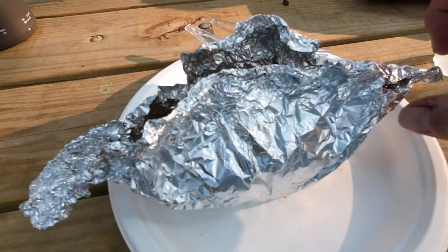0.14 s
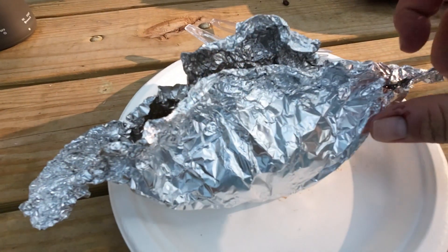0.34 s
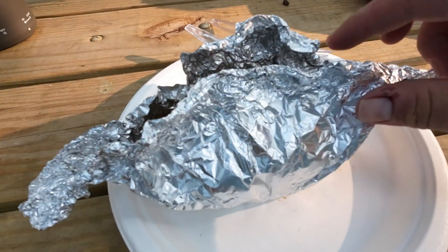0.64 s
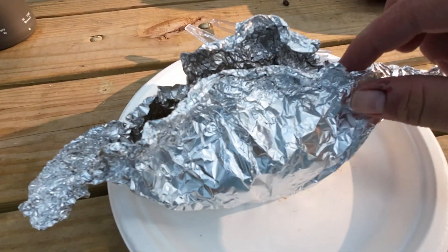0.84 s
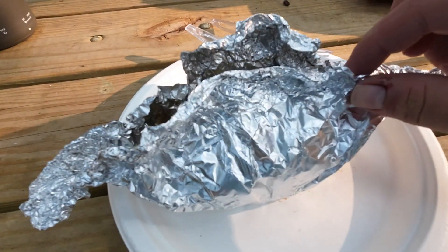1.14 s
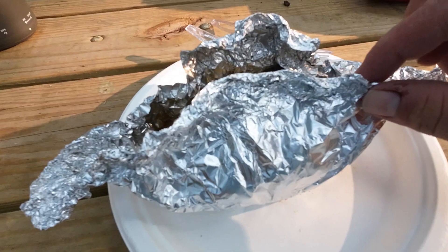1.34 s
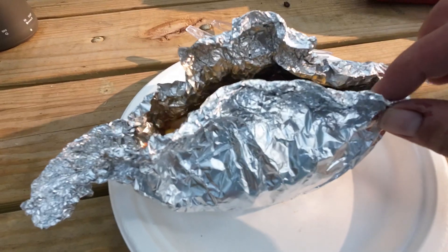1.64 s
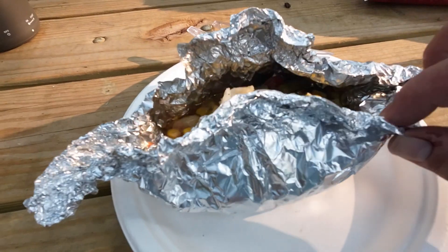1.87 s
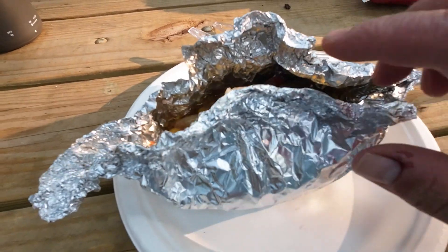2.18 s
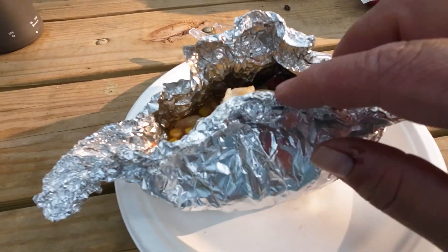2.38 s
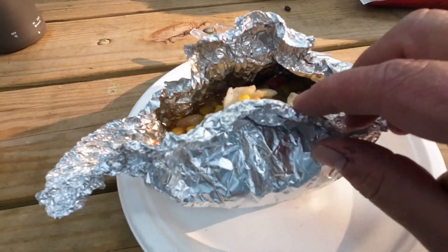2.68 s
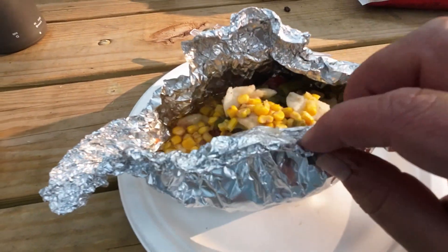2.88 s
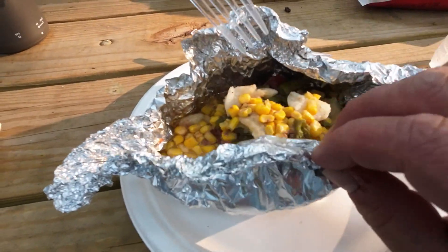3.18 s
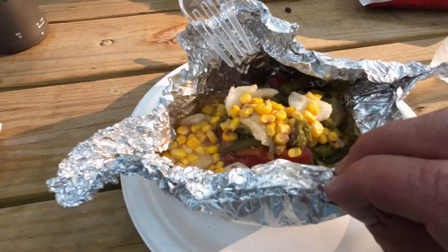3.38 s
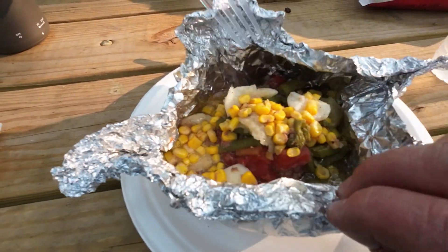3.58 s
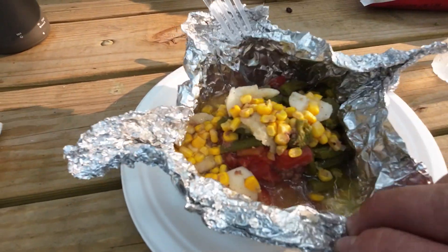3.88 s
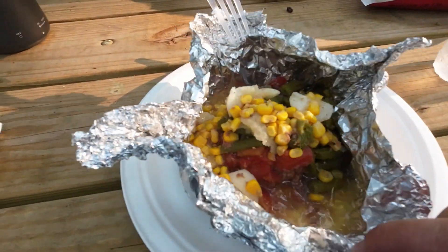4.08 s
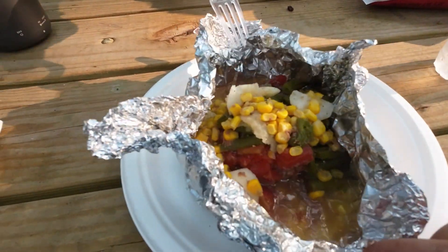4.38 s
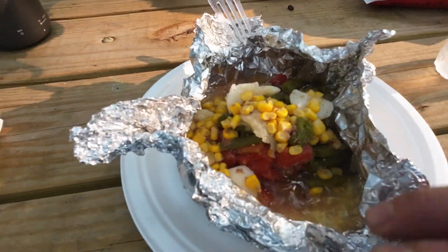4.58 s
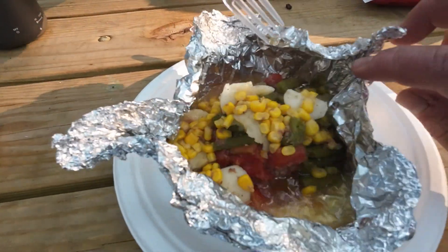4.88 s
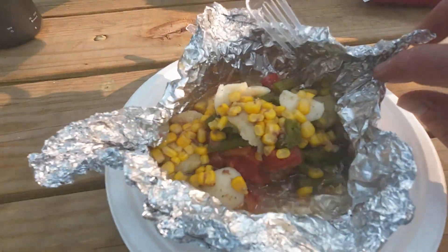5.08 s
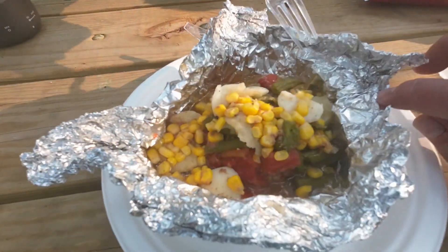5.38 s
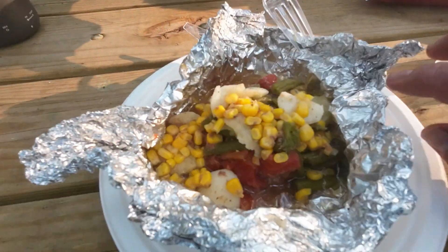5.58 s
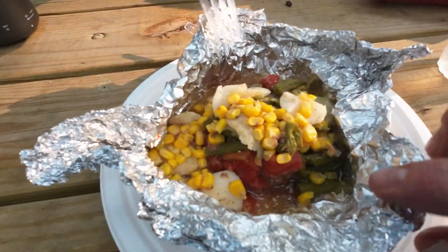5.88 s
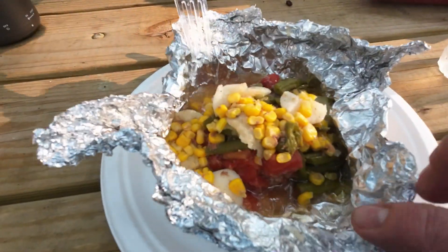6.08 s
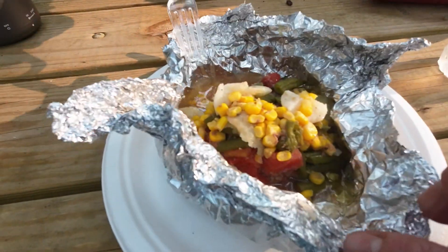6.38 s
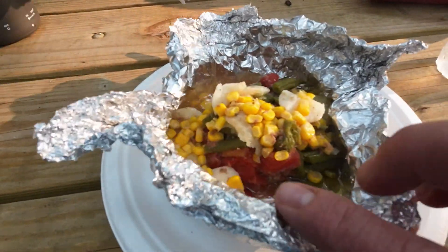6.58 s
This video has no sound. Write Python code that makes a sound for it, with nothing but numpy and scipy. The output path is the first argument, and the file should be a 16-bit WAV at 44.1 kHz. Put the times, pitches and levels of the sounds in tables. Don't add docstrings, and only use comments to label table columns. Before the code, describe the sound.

Very close to the microphone, fingers open a foil packet on a plate outdoors. At first only low wind, distant traffic and faint thin bird whistles, with a few tiny ticks. After two seconds the foil begins to crackle, with sharp metallic snaps, skin hiss and short scrapes on the plate. The loudest pops come near four seconds; crinkling continues in bursts to the end. The sound is slightly hollow.

```python
import sys
import numpy as np
from scipy import signal
from scipy.fft import rfft, irfft, next_fast_len
from scipy.io import wavfile
from scipy.ndimage import uniform_filter1d, map_coordinates

SR = 44100
rng = np.random.default_rng(int(sys.argv[2]) if len(sys.argv) > 2 else 0)


def voltage_ratio(level):
    return 10 ** (np.asarray(level, float) / 20)


def master(y):
    cut = np.clip(np.atleast_2d(y).T, -1, 1)
    pcm = np.round(cut * 32767)
    wavfile.write(sys.argv[1], SR, pcm.astype(np.int16))


N = 296793
LATE_S = 166.5 / 44100

# (frequency [Hz], density [dB per Hz])
AIR_SPECTRUM = [(90, 3), (190, -0.5), (330, -6.5), (420, -16), (770, -18.5), (1100, -20.5), (1500, -28.5),
                (2400, -28), (3500, -32), (6300, -35), (16000, -39)]
# (frequency [Hz], left-right likeness [0-1])
AIR_COHERENCE = [(100, 1), (300, 0.96), (1400, 0.85), (3000, 0.51), (7000, 0), (15000, 0)]
# (time [s], buffet level [dB], drone level [dB])
WIND = [
    (0.0, -57.5, -70.5),
    (2.25, -56.5, -65.5),
    (2.38, -55, -43.5),
    (2.9, -55.5, -75.5),
    (4.54, -56, -57.5),
    (4.91, -49, -45.5),
    (5.32, -53.5, -53.5),
    (6.73, -54, -69),
]
# (time [s], frequency [Hz], level [dB])
THIN_CALLS = [
    [(.18, 9600, -89), (.21, 10600, -89), (.245, 10900, -86), (.27, 11300, -84), (.295, 11200, -83),
     (.305, 10500, -83)],
    [(.32, 10500, -88), (.37, 10900, -94), (.42, 11450, -70), (.46, 11100, -89), (.5, 10100, -93),
     (.545, 9600, -89), (.565, 8700, -95)],
    [(1.89, 9000, -80), (1.94, 11000, -81)],
    [(2.16, 10300, -78), (2.22, 9500, -85), (2.28, 9300, -88)],
]
# (time [s], length [s], start frequency [Hz], end frequency [Hz], level
# [dB])
WHISTLES = [
    (.19, .3, 4040, 3970, -81),
    (.57, .22, 2260, 2080, -80),
    (1.945, .11, 4080, 4010, -74),
    (5.73, .17, 4030, 4020, -82),
    (.001, .19, 2400, 2340, -84),
]
# (time [s], level [dB], frequency [Hz])
THUMPS = [
    (2.063, -39.5, 92),
    (3.574, -42.5, 110),
    (4.834, -46, 126),
    (4.982, -50, 99),
    (6.385, -41, 89.5),
]
# (frequency [Hz], density [dB per Hz])
SHEET_SPECTRUM = [(900, -53), (1500, -2.5), (2400, 5.5), (3500, 7), (5500, -4), (8000, 2.5), (11000, -9)]
# (frequency [Hz], density [dB per Hz])
SKIN_SPECTRUM = [(4300, -12), (5400, 5), (6800, 0.5), (11000, 7), (15800, -1.5)]

# (time [s], length [s], level [dB])
HOLDS = [
    (1.945, 0.23, -73),
    (2.342, 0.85, -72),
    (3.14, 0.45, -74),
    (3.623, 1.075, -70),
    (4.677, 0.36, -81.5),
    (5.028, 0.79, -75.5),
    (6.247, 0.46, -78),
]
# (time [s], length [s], level [dB])
STROKES = [
    (1.021, 0.24, -78.5),
    (1.04, 0.13, -73.5),
    (5.125, 0.51, -72),
    (6.49, 0.096, -62.5),
]
# (time [s], length [s], level [dB])
SLIDES = [(2.116, 0.037, -56), (2.552, 0.081, -57), (2.649, 0.279, -63.5), (2.99, 0.16, -63.5),
          (3.857, 0.064, -62.5), (4.98, 0.042, -83), (5.615, 0.121, -62.5), (6.247, 0.045, -72),
          (6.374, 0.12, -67), (6.533, 0.072, -56), (6.672, .07, -66.5)]
# (time [s], length [s], level [dB])
BENDS = [
    (1.971, 0.046, -70),
    (2.033, 0.057, -60),
    (2.402, 0.068, -62),
    (3.913, 0.067, -53),
    (5.885, 0.13, -53.5),
    (6.093, 0.15, -59),
    (6.6, 0.068, -66.5),
]
# (time [s], length [s], level [dB])
DRAGS = [(3.378, 0.12, -67), (3.566, 0.054, -52.5), (3.705, 0.11, -66), (3.982, 0.21, -69),
         (4.189, 0.13, -62.5), (4.447, 0.15, -67), (4.588, 0.043, -58), (4.632, 0.04, -67.5),
         (4.834, 0.035, -60), (5.245, 0.11, -65), (5.944, 0.11, -58.5), (6.053, 0.04, -50),
         (6.175, 0.07, -52.5), (6.452, 0.069, -57.5)]
# (movements, crackle [dB], finger hiss [dB], plate scrape [dB])
MOVES = [(HOLDS, 0, -5.5, -3.6), (SLIDES, 0, -3, -10), (BENDS, 0, -3.5, -9), (DRAGS, 0, -7, 0),
         (STROKES, -0.5, 0, -1.6)]
# (time [s], length [s],
# level [dB], frequency [Hz])
HOLLOWS = [(1.04, 0.17, -70, 5400), (2.048, 0.081, -57.5, 203), (2.428, .005, -33, 11200),
           (2.1035, .006, -52, 11200), (2.113, 0.03, -68, 870), (2.603, 0.035, -51, 203),
           (2.68, 0.018, -66, 966), (3.339, 0.016, -67, 800), (3.422, 0.052, -60.5, 830),
           (3.569, 0.019, -49.5, 790), (3.6, .014, -47, 1350), (3.734, 0.024, -56, 815),
           (3.785, .015, -67, 860), (3.794, 0.02, -56, 500), (3.893, 0.0092, -62, 840),
           (4.065, 0.039, -57.5, 1090), (4.46, .02, -56, 746), (4.544, 0.023, -63.5, 1020),
           (4.596, 0.027, -57.5, 1090), (4.836, 0.025, -49.5, 320), (4.838, 0.012, -57, 1030),
           (5.126, .06, -73, 2250), (5.311, 0.012, -50, 1080), (5.415, 0.018, -63, 790),
           (5.441, 0.024, -65, 760), (5.636, 0.082, -77, 5700), (5.909, 0.019, -52, 760),
           (5.995, 0.018, -52, 540), (6.052, 0.008, -41.5, 330), (6.053, 0.0065, -44, 1100),
           (6.145, 0.024, -59, 560), (6.23, 0.018, -48, 505), (6.456, 0.017, -51.5, 1360),
           (5.1, 0.15, -55.5, 110), (6.04, .22, -60.5, 150), (6.38, 0.053, -56, 160),
           (6.49, .1, -70, 14500)]

# (time [s], peak level [dB], ring frequency [Hz], tearing time [ms])
PINGS = [(1.5818, -40.5, 2090, 0.61), (2.7249, -20.5, 3970, 1.3), (2.7554, -36, 2520, 1.3),
         (2.7758, -22.5, 1720, 4.7), (2.863, -27.5, 2650, 1.7), (2.877, -35, 3980, 1.5),
         (2.946, -26.5, 4060, 0.3), (2.9923, -42.5, 3250, 1.2), (3.0253, -42, 2290, 1.4),
         (3.2388, -37, 2240, 4.2), (3.8573, -19, 2470, 1.8), (3.9177, -11, 2375, 2.17),
         (3.9526, -36, 3850, 2), (3.9692, -34, 2480, 1.3), (4.2427, -27, 4800, 0.92),
         (4.2665, -16.5, 1750, 2.7), (4.5, -40.5, 2540, 1.7), (5.3729, -33.5, 3460, 2.9),
         (5.464, -42, 2650, 0.93), (5.579, -22, 3730, 1.9), (5.59, -16, 3650, 2.8),
         (6.1692, -28, 3200, 4.5), (6.405, -54, 6200, .8), (6.4154, -43.5, 6300, .8),
         (6.5767, -31, 4180, 1.1)]
# (time [s], peak level [dB], ring frequency [Hz], tearing time [ms])
FOLDS = [(2.3427, -38.5, 4900, 2.1), (2.5574, -26.5, 3450, 7.3), (2.5656, -23.5, 3350, 2.6),
         (2.6106, -24, 5330, 7.6), (3.3373, -42.5, 3700, 6.9), (3.4851, -39, 1860, 2.3),
         (4.0634, -38.5, 1600, 7.7), (4.283, -35.5, 2640, 3.8), (4.367, -24.5, 2370, 4.5),
         (4.5957, -38, 1590, 3.3), (4.9337, -47, 2470, 3.9), (4.9849, -25, 5520, 2.8),
         (5.554, -40, 3280, 2.3), (5.7019, -27.5, 2250, 2.3), (6.1308, -33, 1740, 6.8),
         (6.3873, -21, 6030, 2.4), (6.4221, -46, 5860, 1), (6.6216, -42, 3780, 11)]
# (time [s], peak level [dB], ring frequency [Hz], tearing time [ms])
RIM = [(.9072, -50, 4850, 1.8), (.936, -48, 4040, 2.8), (1.4765, -57.5, 3250, 2.9), (2.101, -30, 2470, 1.7),
       (3.4022, -40, 5300, 2.3), (4.163, -36, 2500, 2), (4.2035, -30, 4870, 1.5), (4.449, -35, 2780, 1.5),
       (4.5618, -31, 2720, 1.4), (5.2442, -39, 1700, 1.7), (5.6259, -43.5, 3300, 1.5),
       (5.8987, -36, 3830, 11), (5.9646, -32.5, 2340, 3.7), (6.3363, -40, 6930, 2)]
# (time [s], peak level [dB], ring frequency [Hz], tearing time [ms])
PRESSED = [(2.3736, -48.5, 5400, 0.65), (2.8639, -43, 1590, 7.2), (3.795, -43.5, 1620, 3.8),
           (4.1926, -34, 1330, 0.83), (4.2119, -28, 1330, 1.7), (5.2184, -51.5, 1630, 1.7),
           (5.2677, -39.5, 1580, 1.4), (5.2803, -40, 3020, 1.3), (5.3112, -31, 5700, 2.45),
           (5.6807, -44.5, 2150, 10.4), (5.9156, -37, 1770, 7.9), (6.4593, -37, 3830, 0.66)]
# (time [s], peak level [dB], ring frequency [Hz], tearing time [ms])
SLAPS = [(.8821, -48.5, 5000, 2.6), (1.7132, -48.5, 5120, 1.4), (1.936, -50, 3930, 0.74),
         (2.036, -38.5, 2210, 3.3), (2.0641, -42, 3250, 1.7), (2.1335, -42, 2000, 4.8),
         (2.6263, -48, 6240, 0.78), (2.702, -42, 1600, 2.6), (3.382, -46.5, 2620, 2.5),
         (3.569, -28.5, 2280, 2), (3.579, -23.5, 4980, 0.9), (3.601, -28, 1710, 2.3),
         (3.828, -46.5, 2190, 2.1), (3.8938, -49, 3840, 1.7), (4.457, -36.5, 2450, 1.9),
         (4.489, -47.5, 5260, 1.3), (4.836, -44, 1590, 3.4), (5.991, -29, 5440, 2.2),
         (6.0543, -32, 1950, 2.5), (6.0791, -25.5, 3510, 2.5), (6.234, -30, 2660, 5),
         (6.3688, -70, 3480, 2.8)]
# (time [s], peak level [dB], ring frequency [Hz], tearing time [ms])
FLICKS = [
    (1.1046, -60, 3260, 1.8),
    (2.0175, -51, 1620, 1.3),
    (2.4216, -68, 3070, 2.5),
    (2.001, -61, 4000, 1.4),
    (2.4288, -36.5, 5900, 1.4),
    (2.4595, -47, 3350, 1.3),
    (4.1279, -48, 1530, 1.4),
    (6.023, -58, 2670, 2.2),
    (6.274, -62, 5460, 0.92),
]
# (time [s], peak level [dB], ring frequency [Hz], tearing time [ms])
POPS = [(2.418, -52, 3300, 4), (2.473, -57, 6000, 1), (2.519, -53, 2800, 2), (2.532, -45.5, 6000, .8),
        (2.546, -55, 2410, .8), (2.5715, -23.5, 2250, 3), (2.611, -22, 5620, 1.2), (2.648, -45, 5500, 1),
        (2.7477, -37, 6500, 0.73), (2.848, -53, 6500, .8), (3.009, -52, 2320, 1.3), (3.446, -49, 2380, 2.4),
        (3.8573, -25, 5600, 0.73), (3.9177, -20.5, 4530, 0.82), (3.858, -28.5, 1500, 1.7),
        (3.93, -36, 5300, 1), (4.146, -44, 2650, 2), (4.229, -52, 1450, 1.3), (4.255, -51, 3100, 1),
        (5.012, -53.5, 5500, .8), (5.021, -55, 5460, 1), (5.047, -52, 6800, .8), (5.077, -60, 5200, 1.4),
        (5.093, -73, 5260, 1), (5.253, -50, 2600, 1.4), (5.337, -56, 4500, 2.5), (5.3666, -37.5, 5500, 1.5),
        (5.526, -50, 1610, 2.5), (5.615, -52, 3450, 1.5), (5.775, -56.5, 5460, 2), (6.072, -35, 3020, 3.4),
        (6.0791, -24.5, 3480, 2.3), (6.365, -59, 5540, 2), (6.383, -41, 5500, 1.5), (6.543, -37, 3190, 1.5),
        (6.557, -42, 3700, 1.9)]
# (creases, plate knock [dB], edge crack [dB])
CREASES = [(PINGS, -34.5, -26), (FOLDS, -21, -21), (RIM, -23, -13), (PRESSED, -11.5, -20.5),
           (SLAPS, -14.5, -12.5), (FLICKS, -18, 0.76)]
POP_KIND = [(POPS, -28, -14.5)]

# (frequency [Hz], width [Hz], level [dB])
PORT_CAVITIES = [(4600, 1000, -17.5), (11000, 9300, 1), (15400, 1000, -3)]
# (frequency [Hz], gain [dB])
MIX_TONE = [(4500, -1.5), (5500, 1.5), (6500, -3.5), (9000, -7.5), (10500, 1.5), (12000, 0.5), (12600, -19),
            (14800, 0), (15750, -4), (16000, -14)]


def unit(x):
    return x / np.sqrt(np.mean(x ** 2) + 1e-20)


def along(points, hz):
    f, v = np.transpose(points)
    return np.interp(np.log(hz + 1), np.log(f + 1), v)


def curves(rows):
    s, *cols = np.transpose(rows)
    return [np.interp(np.arange(N) / SR, s, c) for c in cols]


def wobble(rate):
    knots = rng.standard_normal(int(N * rate / SR) + 4)
    return map_coordinates(knots, [np.arange(N) * rate / SR])


def filtered(x, response):
    m = next_fast_len(N + 8192)
    return irfft(rfft(x, m) * response(np.fft.rfftfreq(m, 1 / SR)), m)[..., :N]


def coloured(x, spectrum):
    closed = [(spectrum[0][0] / 2, -120), *spectrum, (spectrum[-1][0] * 10.0, -120)]
    return unit(filtered(x, lambda hz: voltage_ratio(along(closed, hz))))


def band(x, lo_hz, hi_hz):
    sos = signal.butter(2, [lo_hz, min(hi_hz, SR / 2.1)], "band", fs=SR, output="sos")
    return signal.sosfilt(sos, x)


def patchy(depth_db):
    z = signal.stft(rng.standard_normal((2, N)), nperseg=256)[2]
    field = uniform_filter1d(rng.standard_normal(z.shape[1:]), size=7, axis=0)
    field = uniform_filter1d(field, size=5, axis=1)
    return signal.istft(z * voltage_ratio(depth_db * unit(field)), nperseg=256)[1][:, :N]


def ambience():
    def mid_side(hz):
        turn = np.arccos(np.clip(along(AIR_COHERENCE, hz), -1, 1)) / 2
        return np.array([np.cos(turn), np.sin(turn)])

    mid, side = filtered(coloured(rng.standard_normal((2, N)), AIR_SPECTRUM), mid_side)
    return voltage_ratio(-61.5 + 1.5 * wobble(2.07)) * np.array([mid + side, mid - side])


def wind():
    buffet_db, drone_db = curves(WIND)
    buffet = coloured(rng.standard_normal((2, N)), [(18, -7.5), (35, -10.5), (50, -8.0), (60, -5.0)])
    hum_hz = 35 + 4 * np.array([wobble(9.8), wobble(3.7)])
    hum = np.sin(2 * np.pi * np.cumsum(hum_hz, axis=1) / SR)
    drone = coloured(rng.standard_normal((2, N)),
                     [(62, -10.0), (72, 7.0), (79, 15.0), (88, 3.5), (105, -30.0), (300, -24.0)])
    mid, side = voltage_ratio(buffet_db - 3.0) * (buffet + 0.79 * hum) + voltage_ratio(drone_db - 3.5) * drone
    side = voltage_ratio(2.5) * side + voltage_ratio(-4) * np.roll(mid, 260)
    return np.array([mid + side, mid - side])


def birds():
    t, song = np.arange(N) / SR, np.zeros(N)
    for call in THIN_CALLS:
        first, last = call[0], call[-1]
        hz, db = curves([(first[0] - .01, first[1], -120), *call, (last[0] + .01, last[1], -120)])
        turns = np.cumsum(hz + 90 * wobble(120)) / SR
        loudness = voltage_ratio(db - 1.0 + 2.6 * wobble(81))
        twin = voltage_ratio(-7 + 5 * wobble(22)) * np.sin(2 * np.pi * 1.055 * turns)
        song += loudness * (np.sin(2 * np.pi * turns) + twin)
    for s, length, hz, end_hz, db in WHISTLES:
        u = np.clip((t - s) / length, 0, 1)
        pitch = end_hz + (hz - end_hz) * (1 - u) ** 2 + 25 * wobble(59)
        loudness = voltage_ratio(db - 8 * u + 4 * wobble(35))
        swell = np.abs(np.sin(np.pi * u ** (1 / 4)))
        song += loudness * swell * np.sin(2 * np.pi * np.cumsum(pitch) / SR)
    echo = voltage_ratio(-9) * np.roll(song, 1100)
    return np.array([song, voltage_ratio(6) * np.roll(song, 1)]) + echo


def thumps():
    out, t = np.zeros((2, N + 4096)), np.arange(4096) / SR
    for s, db, hz in THUMPS:
        swing = voltage_ratio(db - 60 * t / 0.1) * np.sin(2 * np.pi * hz * t)
        start = round(s * SR)
        out[:, start:start + len(t)] += swing * voltage_ratio([[-5], [4]])
    return out[:, :N]


def movements():
    t = np.arange(N) / SR + LATE_S / 2
    power = voltage_ratio(2 * np.array((-99, -105, -94)))[:, None]
    for rows, *mix_db in MOVES:
        for s, length, db in rows:
            under_way = (t >= s) & (t < s + length)
            power = power + voltage_ratio(2 * (db + np.array(mix_db)))[:, None] * under_way
    edge_s = 0.009
    return uniform_filter1d(10 * np.log10(power), size=round(edge_s * SR))


def hollows():
    out = np.zeros((2, N + 8192))
    spread = 1.22
    for s, length, db, hz in HOLLOWS:
        u = np.arange(8192) / SR / max(length, .003)
        ring = unit(band(rng.standard_normal((2, 8192)), hz / spread, hz * spread))
        start = round(s * SR)
        out[:, start:start + 8192] += voltage_ratio(db) * np.sin(np.pi * np.minimum(u, 1) ** 0.74) * ring
    return out[:, :N]


def crackle(per_s, size_db, clump_db):
    chance = per_s / SR * voltage_ratio(clump_db * wobble(40))
    size = (rng.random(N) < chance) * voltage_ratio(size_db * rng.exponential(size=N))
    decay = voltage_ratio(-60 * np.arange(600) / SR / 0.0041)
    puffs = signal.fftconvolve(np.minimum(size, 8), decay)[:N]
    return np.abs(puffs) + .3


def ticks():
    per_s, t60_s = 19, 0.0017
    size = (rng.random(N) < per_s / SR) * voltage_ratio(np.minimum(6 * rng.exponential(size=N), 9))
    puffs = signal.fftconvolve(size, voltage_ratio(-60 * np.arange(200) / SR / t60_s))[:N]
    return unit(band(puffs * rng.standard_normal((2, N)), 6500, 16000))


def handling(crackle_db, hiss_db, scrape_db):
    grains = crackle(330, size_db=-1.0, clump_db=12.0)
    slide = np.clip((hiss_db - crackle_db + 6) / 6, 0, 1)
    dense = np.clip((crackle_db + 68) / 18, 0, .65)
    even = np.maximum(slide, dense)
    sheet = coloured((even + (1 - even) * unit(grains)) * patchy(depth_db=3.0), SHEET_SPECTRUM)
    rub = (grains + 0.21 + 4 * slide ** 4) / (1 + 4 * slide ** 4)
    skin = coloured(rub * patchy(depth_db=2.0), SKIN_SPECTRUM)
    scrape = crackle(120, size_db=-2.5, clump_db=-0.5) + .6
    plate = unit(band(scrape * patchy(depth_db=4), 310, 1800))
    rubs = voltage_ratio(crackle_db - 2.5) * sheet + voltage_ratio(hiss_db + 3.0) * skin + voltage_ratio(scrape_db - 1.0) * plate
    return rubs + voltage_ratio(crackle_db - 14) * (1 - slide) * ticks()


def facets():
    most, per_s, centre_hz, spread, t60_s = 4000, 520, 2890, 0.46, .005
    when, pitch = rng.random(most), rng.standard_normal((most, 1))
    size = rng.exponential(size=(most, 1))
    used = np.arange(most)[:, None] < per_s * N / SR
    t = np.arange(400) / SR
    hz = np.clip(centre_hz * np.exp(spread * pitch), 700, 9000)
    pops = used * voltage_ratio(np.minimum(4 * size, 11) - 60 * t / t60_s) * np.sin(2 * np.pi * hz * t)
    places = (when * N).astype(int)[:, None] + np.arange(400)
    train = np.bincount(places.ravel(), pops.ravel(), minlength=N)[:N]
    return unit(np.array([train, np.roll(train, 9)]))


def snaps(kinds):
    t, brief = np.arange(2048) / SR, np.arange(512) / SR
    sheet, crack, knock = np.zeros((3, 2, N + len(t)))
    events = [(*row, *adds) for rows, *adds in kinds for row in rows]
    for s, db, hz, tear_ms, knock_db, crack_db in events:
        at = slice(round(s * SR), round(s * SR) + len(t))
        pitch = hz * np.exp(0.215 * rng.standard_normal((2, 14, 1)))
        pitch[:, :3] = hz * np.array([[.97], [1], [1.04]])
        t60 = .0065 * np.exp(.25 * rng.standard_normal((2, 14, 1)))
        decay = voltage_ratio(1.9 * rng.standard_normal((2, 14, 1)) - 60 * brief / t60)
        modes = decay * np.sin(2 * np.pi * pitch * brief + 2 * np.pi * rng.random((2, 14, 1)))
        onset = 1 - np.exp(-brief / 0.00051)
        ring = np.pad(modes.sum(1) * onset, ((0, 0), (0, len(t) - len(brief))))
        u = t / (np.clip(tear_ms, .4, 9) / 1000)
        jerks = uniform_filter1d(rng.exponential(size=len(t)) ** 2, size=24)
        tear = jerks * (np.sqrt(u) * np.exp(-u) + voltage_ratio(-61.0 - 60 * t / 0.069))
        noise = rng.standard_normal((3, 2, len(t)))
        sheet[:, at] += voltage_ratio(db - 3.0) / (1 + (tear_ms / 3) ** 2) * ring / np.abs(ring[0]).max()
        sheet[:, at] += voltage_ratio(db - 10.5) * band(tear * noise[0], 0.49 * hz, 2.25 * hz)
        crack[:, at] += voltage_ratio(db + crack_db + 7.5) * (tear + 3 * voltage_ratio(-60 * t / 0.0012)) * noise[1]
        knock[:, at] += voltage_ratio(db + knock_db + 11.0) * (tear + voltage_ratio(-9.0 - 60 * t / 0.077)) * noise[2]
    return (sheet + band(crack, 6550, 14300) + band(knock, 56, 2080))[:, :N]


def at_ports(paths):
    main, other = paths
    lead_s = .5e-5

    def cavity(f):
        return sum(voltage_ratio(db) * 1j * f * w / (c * c - f * f + 1j * f * w) for c, w, db in PORT_CAVITIES)

    def lead(f):
        return np.exp(2j * np.pi * f * lead_s * np.array([[-1], [1]]))

    side = filtered(voltage_ratio(-4.0) * other - voltage_ratio(-16.5) * main, cavity) + voltage_ratio(-22) * other
    return filtered(main, lead) + side * [[1], [-1]]


def thinned(x, floor_db):
    hz, _, z = signal.stft(x, SR, nperseg=512)
    power = uniform_filter1d(np.abs(z) ** 2, size=9, axis=1)
    power = uniform_filter1d(power, size=4, axis=2).mean(0)
    whim = uniform_filter1d(rng.standard_normal(power.shape), size=12, axis=0)
    whim = uniform_filter1d(whim, size=6, axis=1)
    silent_below = voltage_ratio(2 * floor_db) + voltage_ratio(-40) * power[20:100].mean(0)
    pitch = hz[:, None]
    weak_band_db = 3 * np.exp(-((pitch - 13100) / 600) ** 2)
    faint = (power < silent_below * voltage_ratio(10 * unit(whim) + 2 * weak_band_db)) & (pitch > 12100)
    return signal.istft(z * ~faint, SR, nperseg=512)[1][:, :N]


def scene():
    levels_db = movements()
    foil = snaps(CREASES) + handling(*levels_db)
    outdoors = thumps() + ambience() + wind() + birds()
    small = snaps(POP_KIND) + hollows() + voltage_ratio(levels_db[0] - 5) * facets()
    return at_ports(foil + small) + outdoors


def low_pass(x):
    return signal.sosfilt(signal.butter(12, 18030, fs=SR, output="sos"), x)


def record(dry):
    early = filtered(dry.mean(0), lambda hz: voltage_ratio(2.0) / (1 + (hz / 9000) ** 20) ** .5)
    late = filtered(dry, lambda hz: voltage_ratio(-3.0) * np.exp(-2j * np.pi * hz * LATE_S))
    both = filtered(early + late, lambda hz: voltage_ratio(along(MIX_TONE, hz)))
    t = np.arange(N) / SR
    gone = uniform_filter1d(1. * ((t > 2.1068) & (t < 2.1225)), size=40)
    both = both - gone * filtered(both, lambda hz: (hz > 900) * (np.abs(hz - 5400) > 250))
    mix = thinned(both, floor_db=-113)
    return low_pass(mix)


dry = scene()
out = record(dry)
master(out)
```